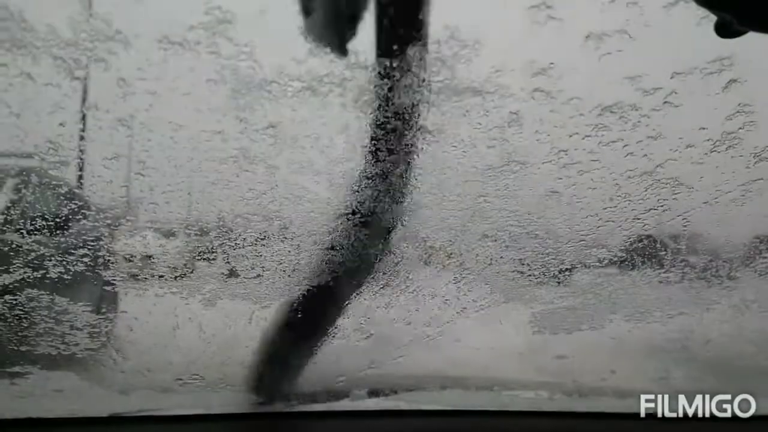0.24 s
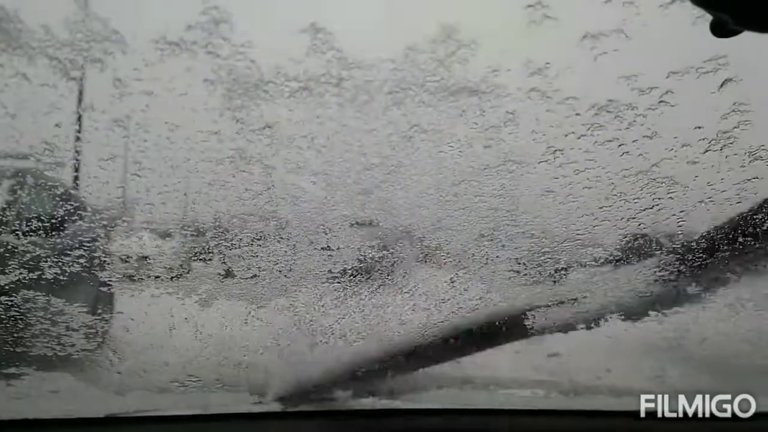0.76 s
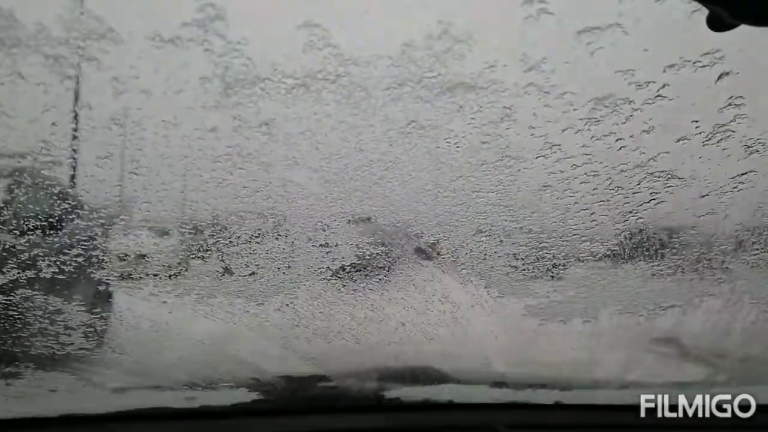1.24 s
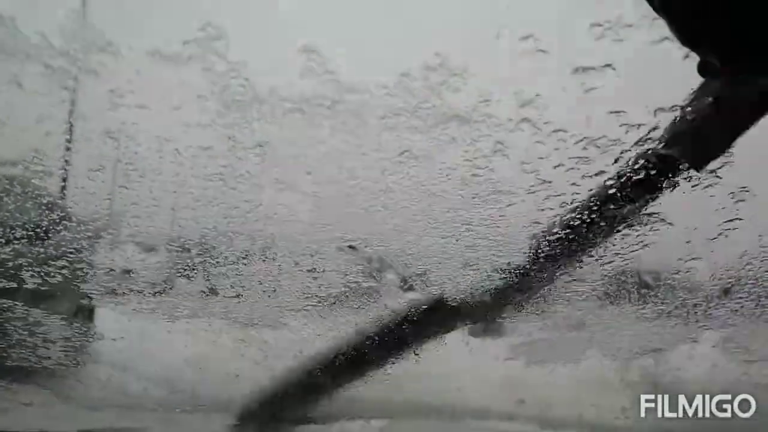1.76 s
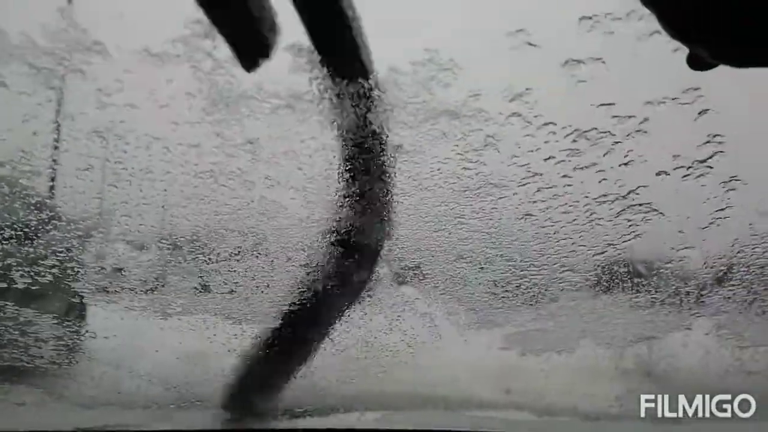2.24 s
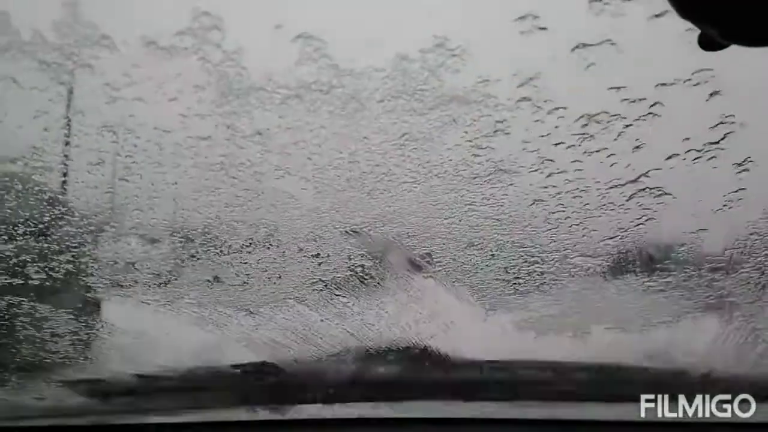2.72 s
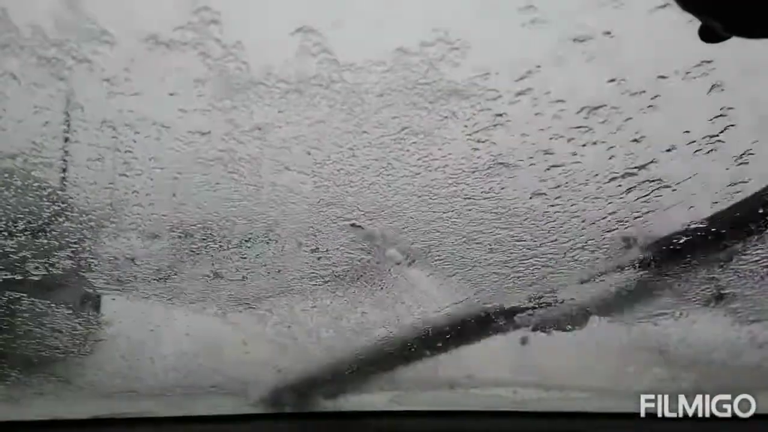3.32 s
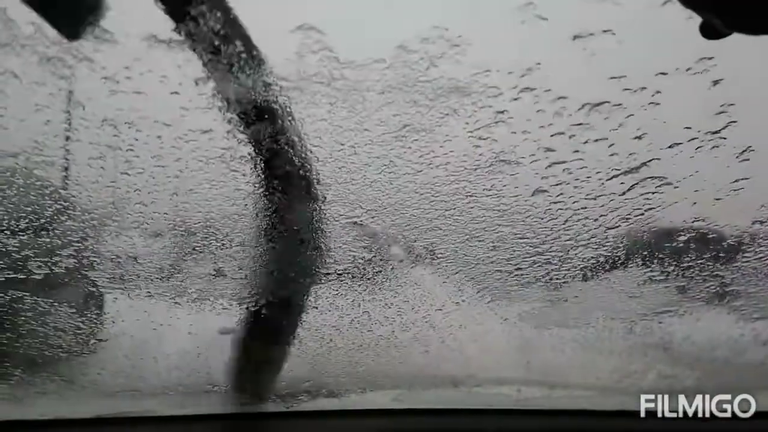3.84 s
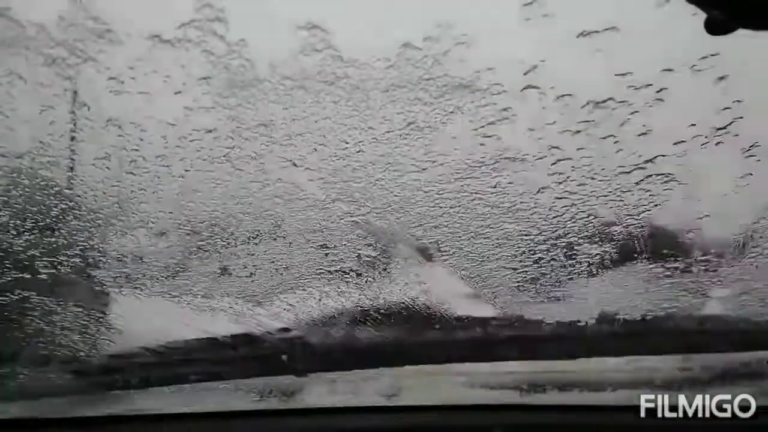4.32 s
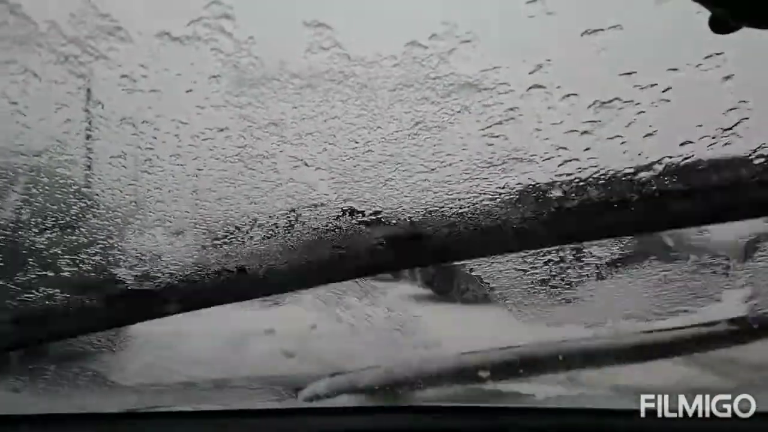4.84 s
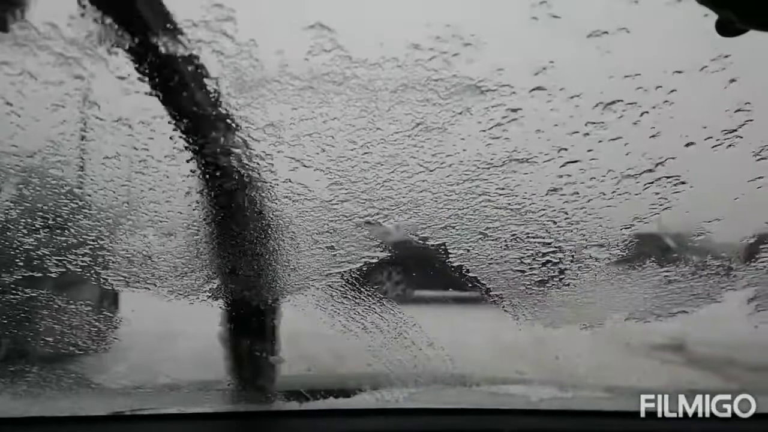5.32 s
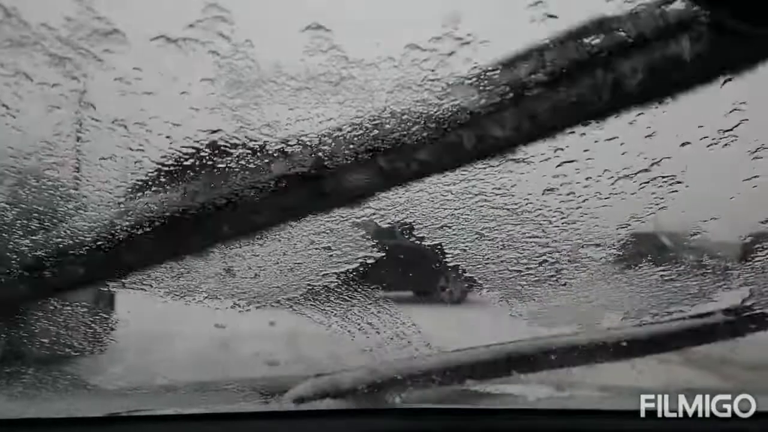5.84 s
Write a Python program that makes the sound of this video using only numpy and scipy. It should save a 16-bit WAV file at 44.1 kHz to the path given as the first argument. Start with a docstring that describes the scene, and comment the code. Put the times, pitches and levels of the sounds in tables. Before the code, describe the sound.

Heard from inside a parked car, two wiper blades scrape an icy windshield in quick, regular strokes. Each stroke is a gritty rasp with low glass rumble and fizzing slush, dying away at the turns. At the bottom the arms thud and the rubber flips with a hollow tock. Engine hum and faint sleet lie beneath; midway a car hisses past outside.

```python
"""Inside a parked car an engine idles and sleet patters while two wiper blades, first heard in mid-upstroke,
scrape an icy windscreen: random impulses, filtered, make cabin and panels boom, glass rumble, ice rasp and
slush fizz. Rasp, glass rumble and fizz die down at each turn, while the deep boom swells towards the bottom.
At each bottom turn the arms thud and the rubber lip flips over (damped sines).
From about 3 s a car hisses past in the slush (filtered impulses), while the sweeping goes on."""
import sys
import numpy as np
from scipy import signal
from scipy.fft import rfft, irfft
from scipy.io import wavfile
from scipy.ndimage import uniform_filter1d

SR = 44100
rng = np.random.default_rng(int(sys.argv[2]) if len(sys.argv) > 2 else 0)


def voltage_ratio(decibels):
    """Convert decibels (scalar or array-like) to amplitude ratios, 20 dB per decade."""
    exponent = np.asarray(decibels, float) / 20
    return 10 ** exponent


def store_pcm(level_fs):
    """Save levels as 16-bit WAV."""
    pcm = np.round(np.clip(level_fs, -1, 1) * 32767).astype(np.int16)
    wavfile.write(sys.argv[1], SR, np.atleast_2d(pcm).T)


N = 267731   # samples
HZ = np.fft.rfftfreq(N, 1 / SR)

# steady sleet on roof and glass, spectral shape: f/Hz, relative density/dB
SLEET_SPECTRUM = [(300, 2.5), (600, -13), (1100, 3), (1700, 3), (2500, -22), (5000, -26), (7000, -26),
                  (9000, -40), (13000, -34), (15700, -27)]
SLEET_DB = -48.5
# lowest firing order of the engine; pan is left over right
IDLE_HZ, IDLE_DB, IDLE_PAN_DB = 39.4, -36, -2
# a car passes outside through the slush: t/s, hiss level/dB
PASSING_LEVEL = [(3.0, -62), (3.4, -54), (3.65, -44), (3.82, -40), (3.9, -47), (4.1, -42), (4.4, -41),
                 (4.62, -40), (4.7, -43), (4.9, -41), (5.2, -46), (5.44, -41), (5.58, -45), (6.07, -44)]
# its tyre hiss, spectral shape: f/Hz, relative density/dB
TYRE_SPECTRUM = [(1200, -14), (2200, -4), (3500, -4), (5000, -0.5), (7000, -4), (8100, -13), (9000, -6),
                 (12000, -15), (14000, -7), (15700, -12)]
TYRES_PAN_DB = -2.5

# level of left over right channel, before the room peaks; the right is nearly empty
# around 8 to 11 kHz: f/Hz, level/dB
LEFT_OVER_RIGHT_DB = [(60, 3.5), (140, 0.5), (330, 4), (380, -1), (480, 5), (770, 1), (1800, 1.5),
                      (3500, -4), (4050, -3.5), (4600, -6.5), (5500, 4.5), (7000, 15), (8100, 72),
                      (9000, 88), (11500, 39), (13500, 9), (15500, 4)]
# power share of the sound common to both channels: f/Hz, share/1
COMMON_SHARE = [(40, 0.98), (65, 0.85), (200, 0.88), (380, 0.79), (700, 0.19), (1300, 0.38), (2500, 0.25),
                (5000, 0.09), (10000, 0.15)]
# reflections off dashboard and side windows colour each microphone: f/Hz, width/Hz, peak or dip/dB
LEFT_REFLECTIONS = [(1040, 180, -0.5), (1880, 140, 2), (2920, 150, 1), (2760, 170, 0.5), (3430, 200, 3.5),
                    (4080, 250, -4.5), (4820, 210, 0), (7850, 270, -7.5)]
RIGHT_REFLECTIONS = [(616, 49, -0.5), (810, 70, 2), (1070, 30, 2), (1170, 170, 2), (1210, 52, -6),
                     (1410, 99, -6), (1461, 96, 7.5), (1805, 130, 6.5), (2040, 180, -2.5),
                     (2740, 440, -0.5)]
LEFT_LEAD_S, LAG_FROM_HZ = 0.000526, 490   # the lead is approached well above LAG_FROM_HZ

# arms stopping at the bottom: t/s, height of the exciting click/dB
THUD_CLICKS = [(1.327, -14), (2.985, -13), (4.636, -12)]
THUD_HZ, THUD_T60_S, THUD_RISE_HZ = 115, .045, 250
# rubber lip flipping over: t/s, peak level/dB
FLIP_PEAKS = [(1.347, -26), (3.005, -24), (4.656, -22.5)]
# ring of the lip, shorter and lower on the left; rows left, right: f/Hz, t60 of the longer of two rings/s
FLIP_RINGS = [(690, .015), (770, .022)]

# deep cabin resonances: f/Hz, width/Hz, relative level/dB
CABIN_MODES = [(54.3, 11, -8.5), (70.3, 21, -2)]
# door-panel resonances: f/Hz, width/Hz, relative level/dB
PANEL_MODES = [(97.4, 28, -6.5), (121.7, 63, -2), (159, 22, -3.5), (179.3, 40, -1), (211.5, 21, -6)]
# glass rumble, spectral shape: f/Hz, relative density/dB
GLASS_SPECTRUM = [(170, -36), (230, 1.5), (265, 1.5), (316, -4.5), (369, -2), (420, -6), (520, -5),
                  (700, -9), (972, -11.5), (1400, -17.5), (2500, -52.5)]
# slush fizz, spectral shape: f/Hz, relative density/dB
FIZZ_SPECTRUM = [(6000, -21), (7600, 0), (8090, -17), (8700, -1.5), (10000, -5), (11900, -11),
                 (14000, -7.5), (15700, -13.5)]
# ice rasp, spectral shape: f/Hz, relative density/dB
RASP_SPECTRUM = [(700, -43), (1100, -8), (1450, -5.5), (1820, -4), (2500, 0), (3300, -1.5), (4670, -1),
                 (5500, -6), (6390, -7), (7300, -13), (8000, -19), (9000, -25.5)]
BRIGHT_HZ = 4200   # brightness acts mainly above this

# the blades leave the bottom, turn at the top and return, over and over
FIRST_BOTTOM_S, CYCLE_S = -0.29, 1.6545
TOP_TURN_S = .845   # after the bottom turn
# one cycle of scraping: t after the bottom turn/s, rasp level/dB, relative rasp brightness/dB,
# glass level/dB, fizz level/dB
SCRAPE_CYCLE = [(0.0, -51, -7, -34.5, -74), (0.03, -47, -9, -35, -72), (0.055, -35, -5, -34, -62),
                (0.1, -25.5, -12, -28.5, -49), (0.18, -26, -8, -26.5, -45), (0.27, -26, -3.5, -27, -41),
                (0.42, -26.5, -3, -26, -41), (0.5, -28, -5, -26, -44.5), (0.62, -28.5, -4.5, -27, -50),
                (0.71, -33, -6, -30, -56.5), (0.78, -39, -8, -33.5, -65), (0.82, -48.5, -8, -37, -77),
                (0.87, -48, -14, -37.5, -80), (0.91, -36, -0.5, -34.5, -55),
                (0.97, -32.5, -2, -29.5, -52.5), (1.05, -27.5, -4, -25.5, -48), (1.12, -30, -2, -27.5, -45),
                (1.2, -26, -4, -25.5, -41.5), (1.32, -27.5, -3, -27, -41.5), (1.42, -27.5, -6, -27, -43),
                (1.52, -26.5, -8.5, -27.5, -48.5), (1.57, -32.5, -7.5, -33, -50),
                (1.61, -41, -5, -38.5, -68)]
# one cycle of load on the arms: t after the bottom turn/s, panel level/dB, cabin level/dB
ARM_LOAD_CYCLE = [(0.04, -29, -31), (0.12, -24.5, -29.5), (0.22, -23, -29), (0.42, -26, -34),
                  (0.58, -22.5, -38), (0.72, -26.5, -32), (0.82, -30, -33.5), (0.9, -28.5, -28),
                  (0.97, -27, -32), (1.08, -25, -31), (1.25, -24.5, -30.5), (1.33, -20, -27),
                  (1.4, -20.5, -26), (1.47, -27.5, -28), (1.55, -23.5, -21)]
# offsets of each stroke, up and down in turn: rasp/dB, brightness/dB, glass/dB, panel/dB, cabin/dB
STROKE_OFFSETS = [(-1, -1, -1, -1.5, 2.5), (-1.5, 0.5, -0.5, 1, -0.5), (0, -0.5, .5, 0, -1),
                  (-0.5, 0.5, .5, -0.5, 2), (-1.5, -1, 0, 0, 0), (-1.5, 1.5, -.5, 0, 1.5), (0, -2, 0, 0, 2),
                  (-0.5, 0.5, 1, -1, 2)]
# the blades break a crust of ice: t/s, length/s, rasp lift/dB, fizz lift/dB
CRUST_BREAKS = [(1.017, 0.014, 4, 10), (1.3, .015, 1.5, 14), (2.432, 0.019, 2, 3)]
# raised blades are heard more to the left
RASP_SWING_DB, FIZZ_SWING_DB, FIZZ_SWING_POWER = 5, 21.5, 2.1


def rms_one(x):
    """Normalisation to unit rms."""
    return x / np.sqrt(np.mean(x ** 2) + 1e-20)


def in_time(rows):
    """Linear interpolation of a table over time, one curve a column."""
    s, *columns = np.transpose(rows)
    return [np.interp(np.arange(N) / SR, s, c) for c in columns]


def in_cycle(rows):
    """Periodic interpolation of a one-cycle table, repeated sweep after sweep."""
    s, *columns = np.transpose(rows)
    return [np.interp(np.arange(N) / SR - FIRST_BOTTOM_S, s, c, period=CYCLE_S) for c in columns]


def at_hz(points):
    """Interpolation of a spectrum on a logarithmic frequency axis."""
    hz, value = np.transpose(points)
    return np.interp(np.log(HZ + 1), np.log(hz), value)


def drift(rate_hz):
    """Low-passed noise: slow chance of unit spread with two real poles at rate_hz."""
    step = 40   # samples between computed values
    warm_up = 2000
    r = np.exp(-2 * np.pi * rate_hz * step / SR)
    noise = rng.standard_normal(N // step + warm_up + 2)
    slow = signal.lfilter([1], [1, -2 * r, r * r], noise)[warm_up:]
    return np.interp(np.arange(N) / step, np.arange(len(slow)), rms_one(slow - slow.mean()))


def random_impacts(per_s, spread_db, judder_db, judder_hz):
    """Random impulses of uneven strength: three independent streams share one fluctuation of level."""
    uneven = voltage_ratio(spread_db * np.minimum(rng.exponential(1, (3, N)), 4))
    size = uneven * rng.standard_normal((3, N))
    struck = rng.random((3, N)) < per_s / SR
    return rms_one(size * struck) * voltage_ratio(judder_db * drift(judder_hz))


def resonances(modes):
    """Incoherent superposition: the power responses of the resonances add."""
    power = sum(voltage_ratio(2 * db) / (1 + (2 * (HZ - hz) / width) ** 2) ** 2 for hz, width, db in modes)
    return np.sqrt(power)


def room(peaks):
    """Coloration by reflections: gain over frequency from peaks and dips in dB."""
    return voltage_ratio(sum(db / (1 + (2 * (HZ - hz) / width) ** 2) for hz, width, db in peaks))


def at_microphones(streams, colour):
    """Partial coherence: one stream reaches both microphones, the others arrive diffusely, one at each."""
    shared, left, right = rfft(streams, axis=1) * colour
    share = np.clip(at_hz(COMMON_SHARE), 0, 1)
    left_power = 1 / (1 + voltage_ratio(-2 * at_hz(LEFT_OVER_RIGHT_DB)))
    # standing bass waves have no direction, so only the higher sound reaches the left first
    lag_s = LEFT_LEAD_S / (1 + (LAG_FROM_HZ / (HZ + 1)) ** 3.8)
    late = shared * np.exp(-2j * np.pi * HZ * lag_s)
    at_left = np.sqrt(left_power) * (np.sqrt(share) * shared + np.sqrt(1 - share) * left)
    at_right = np.sqrt(1 - left_power) * (np.sqrt(share) * late + np.sqrt(1 - share) * right)
    coloured = np.array([at_left * room(LEFT_REFLECTIONS), at_right * room(RIGHT_REFLECTIONS)])
    out = irfft(coloured, N, axis=1)
    return out / np.sqrt(np.mean(out.mean(axis=0) ** 2))   # unit rms of the mean of both


def pan(left_over_right_db):
    """Level difference between the channels: gains for left and right."""
    return voltage_ratio(np.outer([.5, -.5], left_over_right_db))


def lean_to(pan_db):
    """Moving level difference as the blades cross the glass, about its mean."""
    return pan(pan_db - pan_db.mean())


def clicks_at(events):
    """Impulsive excitation: a click of the given height at each event."""
    clicks = np.zeros(N)
    for s, db in events:
        clicks[round(s * SR)] = voltage_ratio(db)
    return clicks


def ring(x, hz, t60_s):
    """Damped oscillator: a unit click sets off a decaying sine of initial height 1."""
    r, w = voltage_ratio(-60 / (t60_s * SR)), 2 * np.pi * hz / SR
    return signal.lfilter([0, np.sin(w)], [1, -2 * r * np.cos(w), r * r], x + 1e-18)


def sleet():
    """Superposed random impacts on roof and glass form a filtered noise."""
    impacts = random_impacts(6000, spread_db=-1.0, judder_db=2.0, judder_hz=1)
    return at_microphones(impacts, voltage_ratio(at_hz(SLEET_SPECTRUM))) * voltage_ratio(SLEET_DB)


def idle():
    """Periodic firing gives a sine at the lowest engine order, wavering in frequency and level."""
    phase = 2 * np.pi * np.cumsum(IDLE_HZ * (1 + 0.017 * drift(1.0))) / SR
    hum = np.sqrt(2) * np.sin(phase) * voltage_ratio(IDLE_DB + 1.8 * drift(3.4))
    return hum * pan(IDLE_PAN_DB)


def passing_car():
    """Random slush impacts at the tyres make a noise that follows the level curve of the passage."""
    impacts = random_impacts(15000, spread_db=4.0, judder_db=2.2, judder_hz=12)
    hiss = at_microphones(impacts, voltage_ratio(at_hz(TYRE_SPECTRUM)))
    return hiss * voltage_ratio(in_time(PASSING_LEVEL)[0]) * pan(TYRES_PAN_DB)


def arm_thuds():
    """Impulse response of a damped mode, its attack softened by a one-pole low-pass."""
    soft = np.exp(-2 * np.pi * THUD_RISE_HZ / SR)
    return signal.lfilter([1 - soft], [1, -soft], ring(clicks_at(THUD_CLICKS), THUD_HZ, THUD_T60_S))


def lip_flips():
    """Two damped modes in cascade give the short hollow tock of soft rubber, heard first at the left."""
    strongest = voltage_ratio(max(db for s, db in FLIP_PEAKS))
    tocks = []
    for hz, t60_s in FLIP_RINGS:
        tock = ring(ring(clicks_at(FLIP_PEAKS), hz, t60_s), hz, t60_s / 2)
        tocks.append(tock / np.abs(tock).max() * strongest)
    left, right = tocks
    return np.array([left, np.roll(right, round(LEFT_LEAD_S * SR))])


def per_stroke():
    """Piecewise constant strength: the offsets of the stroke under way, changing as the blades turn."""
    cycle, s = np.divmod(np.arange(N) / SR - FIRST_BOTTOM_S, CYCLE_S)
    stroke = np.minimum(2 * cycle + (s > TOP_TURN_S), len(STROKE_OFFSETS) - 1).astype(int)
    return uniform_filter1d(np.array(STROKE_OFFSETS, float)[stroke], size=2000, axis=0).T


def blade_height():
    """Periodic motion: 0 at the bottom, 1 at mid-cycle, as a squared sine."""
    return np.sin(np.pi * (np.arange(N) / SR - FIRST_BOTTOM_S) / CYCLE_S) ** 2


def crusts():
    """Breaking of a crust: short Gaussian swells of rasp and fizz, in dB."""
    t = np.arange(N) / SR
    return sum(np.outer(lift_db, np.exp(-((t - s) / length) ** 2)) for s, length, *lift_db in CRUST_BREAKS)


def cabin_boom(level_db):
    """Forced vibration of the cabin: rubber friction excites its deep resonances."""
    friction = random_impacts(1500, spread_db=1.5, judder_db=0.2, judder_hz=9.7)
    return at_microphones(friction, resonances(CABIN_MODES)) * voltage_ratio(level_db)


def panel_boom(level_db):
    """Forced vibration of the door panels: rubber friction excites their resonances."""
    friction = random_impacts(3000, spread_db=1.5, judder_db=0.76, judder_hz=9.5)
    return at_microphones(friction, resonances(PANEL_MODES)) * voltage_ratio(level_db)


def glass_rumble(level_db):
    """Forced vibration of the glass: frozen drops catch the rubber, and the glass shapes the spectrum."""
    friction = random_impacts(5000, spread_db=1.5, judder_db=0.64, judder_hz=8.2)
    return at_microphones(friction, voltage_ratio(at_hz(GLASS_SPECTRUM))) * voltage_ratio(level_db)


def slush_fizz(level_db, pan_db):
    """Dense random impacts in the slush make a treble noise that moves with the blades."""
    friction = random_impacts(15000, spread_db=-0.5, judder_db=1.5, judder_hz=19)
    return at_microphones(friction, voltage_ratio(at_hz(FIZZ_SPECTRUM))) * voltage_ratio(level_db) * lean_to(pan_db)


def ice_rasp(level_db, bright_db, pan_db):
    """Friction on ice: harder ice lifts the treble, and patches make each third-octave swell on its own."""
    friction = random_impacts(12000, spread_db=0.5, judder_db=.5, judder_hz=25)
    whole = at_microphones(friction, voltage_ratio(at_hz(RASP_SPECTRUM)))
    spectrum, out = rfft(whole, axis=1), 0
    octave = np.log2(HZ + 1)
    brighter_db = bright_db - bright_db.mean()
    for centre in np.arange(9, 13.5, 1 / 3):   # octaves above 1 Hz
        band = np.clip(1 - 3 * np.abs(octave - centre), 0, 1)   # overlapping triangles
        upper = 1 / (1 + (BRIGHT_HZ / 2 ** centre) ** 3.8)
        patches_db = 1.3 * drift(10)
        out = out + voltage_ratio(upper * brighter_db + patches_db) * irfft(spectrum * band, N, axis=1)
    return out * voltage_ratio(level_db) * lean_to(pan_db)


def scene():
    """Linear superposition: all answers to the same sweeping blades, over sleet, engine and passing car."""
    rasp_db, bright_db, glass_db, fizz_db = in_cycle(SCRAPE_CYCLE)
    panel_db, cabin_db = in_cycle(ARM_LOAD_CYCLE)
    more_rasp, more_bright, more_glass, more_panel, more_cabin = per_stroke()
    crust_rasp, crust_fizz = crusts()
    raised = blade_height()

    background = sleet() + idle() + passing_car()
    turns = arm_thuds() + lip_flips()
    body = cabin_boom(cabin_db + more_cabin) + panel_boom(panel_db + more_panel)
    body = body + glass_rumble(glass_db + more_glass)
    fizz = slush_fizz(fizz_db + more_rasp + more_bright + crust_fizz,
                      FIZZ_SWING_DB * raised ** FIZZ_SWING_POWER)
    rasp = ice_rasp(rasp_db + more_rasp + crust_rasp, bright_db + more_bright, RASP_SWING_DB * raised)
    return background + turns + body + fizz + rasp


def top_cut(x):
    """Nothing passes above the cut-off."""
    return signal.sosfilt(signal.butter(12, 15700, fs=SR, output="sos"), x)


def record(dry):
    """High-pass filtering and saturation: a steep bass cut at 35 Hz, then softly rounded peaks."""
    bass_cut = signal.butter(8, 35, "high", fs=SR, output="sos")
    cut = signal.sosfilt(bass_cut, dry)
    mix = 0.94 * np.tanh(cut / 0.88)
    return top_cut(mix)


dry = scene()
out = record(dry)
store_pcm(out)
```